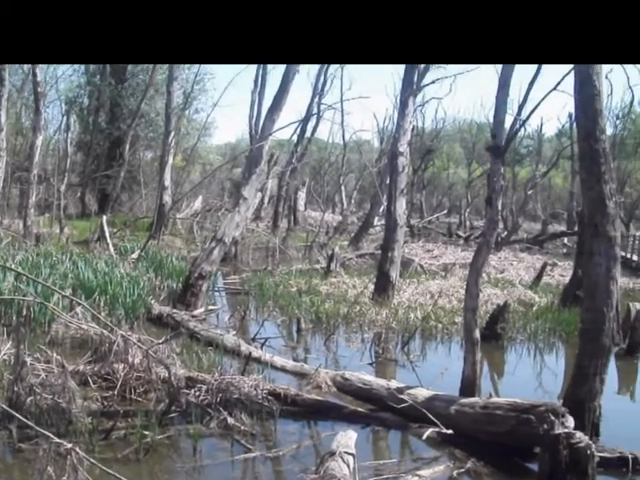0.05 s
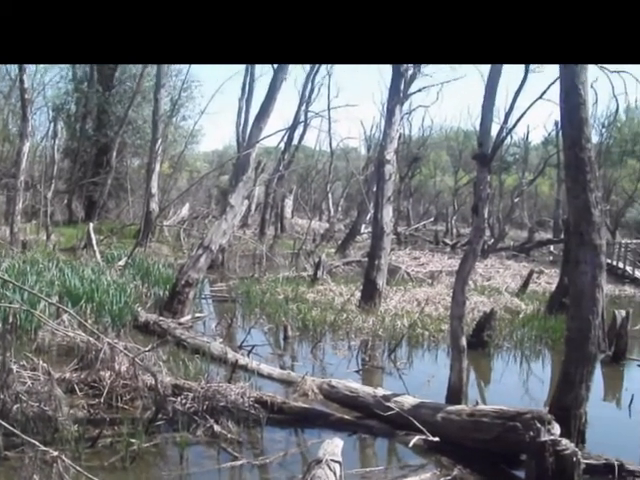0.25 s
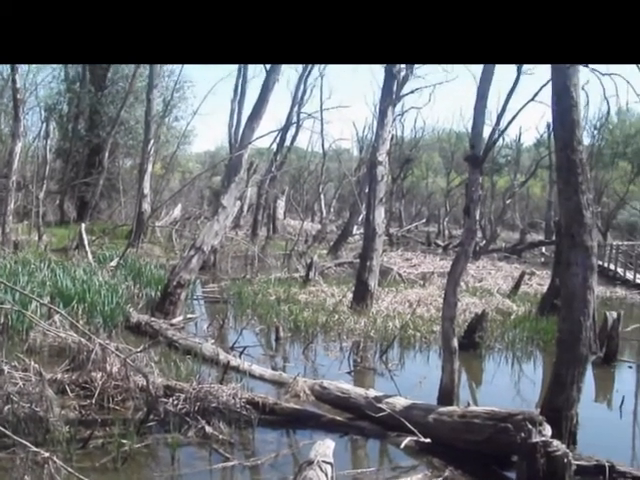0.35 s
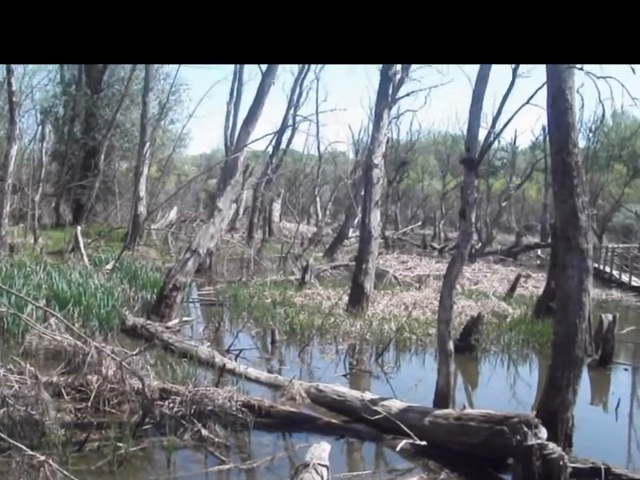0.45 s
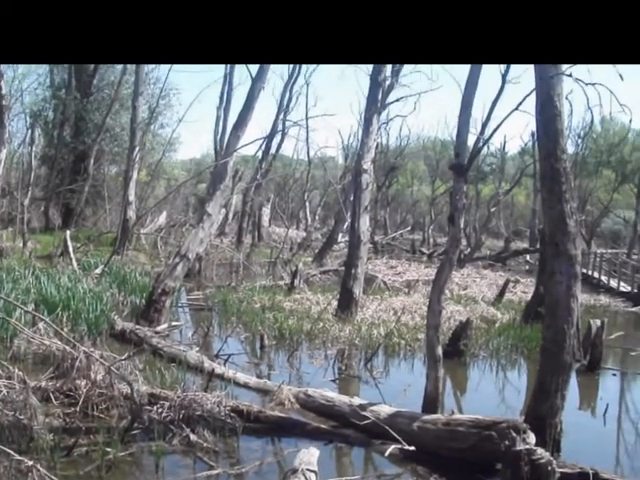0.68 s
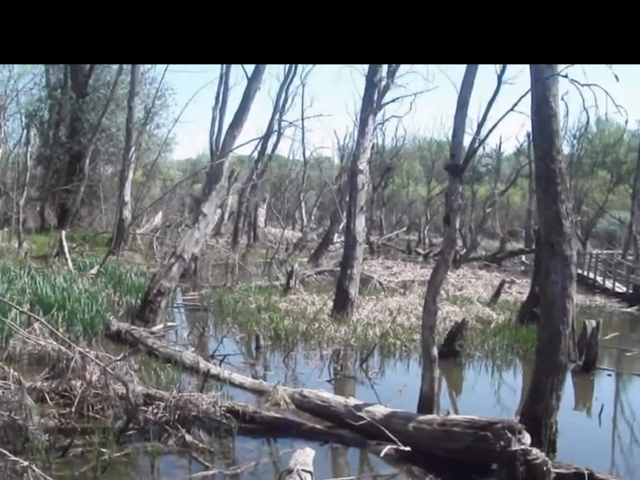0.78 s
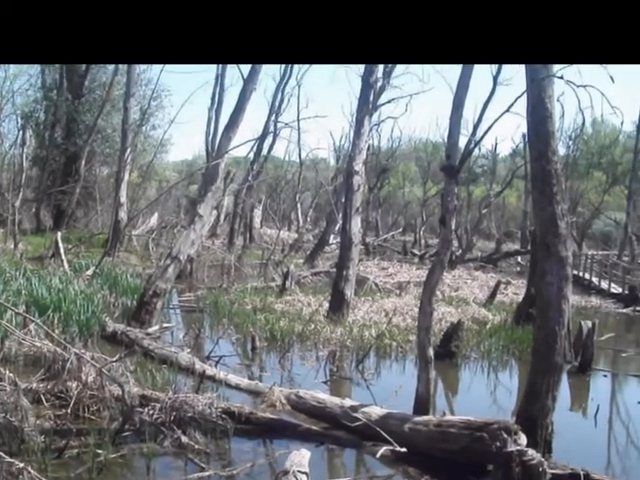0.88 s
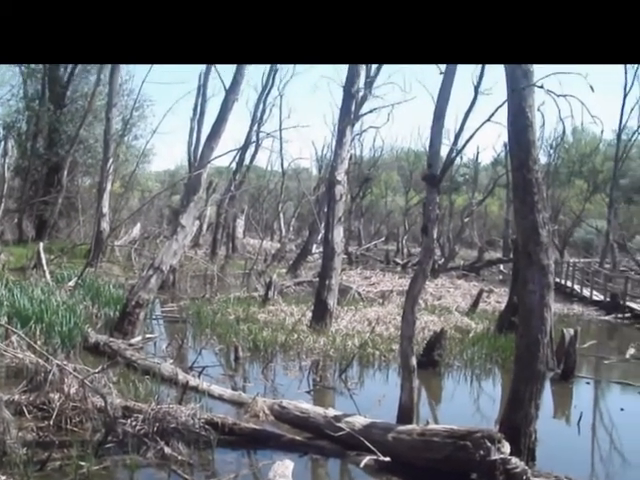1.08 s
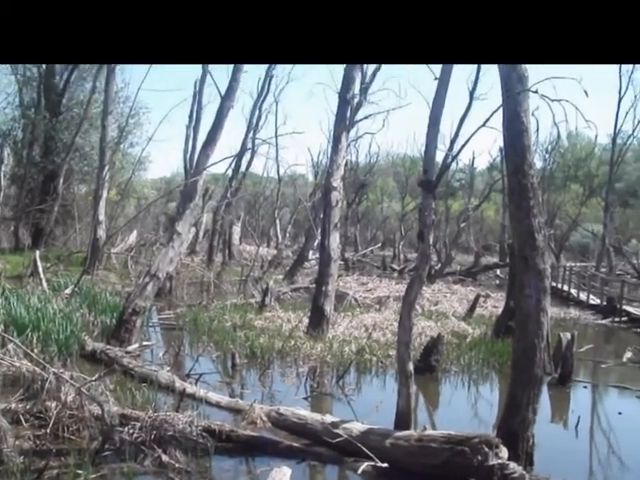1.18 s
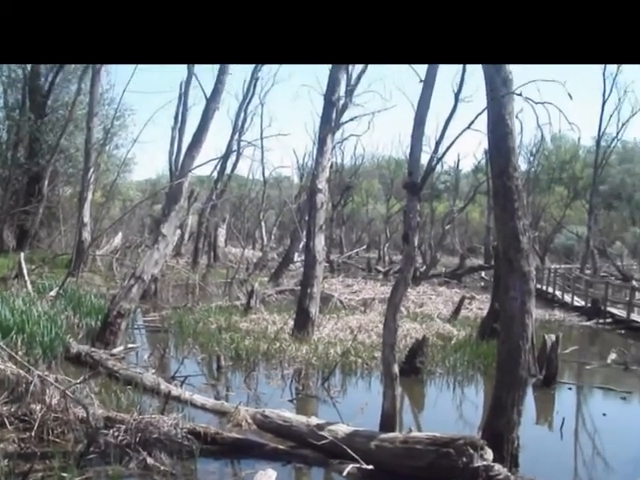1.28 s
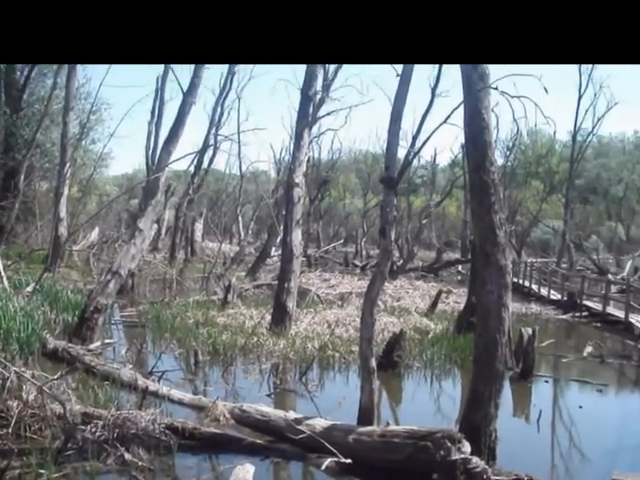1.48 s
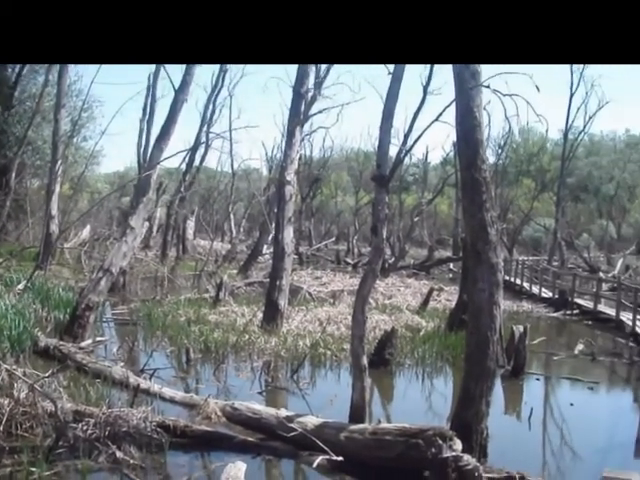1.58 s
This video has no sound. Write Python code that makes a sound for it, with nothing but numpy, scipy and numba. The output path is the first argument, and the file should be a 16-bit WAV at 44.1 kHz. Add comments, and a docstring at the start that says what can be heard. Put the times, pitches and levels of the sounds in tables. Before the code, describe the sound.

Frogs croak and cluck in a marsh over a distant chorus and steady hiss.

```python
"""Frogs in a flooded wood. From the start a distant chorus murmurs over the air and a camera's hiss and
whine, while frogs further out rattle short, low croaks: pulses that ring sac and body. At 0.3 s a small
bird begins to whistle faintly. From 0.46 s one close frog gives four sharp, falling clucks, its vocal
folds driving sac and throat; from 0.84 s a far frog answers with six. Last come a few more croaks and
whistles and a little handling noise. Water and trunks return a thin echo of the calls."""
import sys
import numpy as np
from scipy import signal
from scipy.fft import rfft, irfft
from scipy.io import wavfile
from scipy.ndimage import uniform_filter1d
from numba import njit

SR = 44100
rng = np.random.default_rng(int(sys.argv[2]) if len(sys.argv) > 2 else 0)


def store_wav(level_fs):
    """Save 16-bit WAV to argv[1]."""
    pcm = np.round(np.clip(np.atleast_2d(level_fs), -1, 1) * 32767)
    wavfile.write(sys.argv[1], SR, pcm.T.astype(np.int16))


N = 72765
CROAK_LOW_HZ, CROAK_TOP_HZ = 354, 2760


def undb(db):
    return 10 ** (np.asarray(db) / 20)


def unit(x):
    return x / np.sqrt(np.mean(x ** 2) + 1e-18)


def noise():
    return rng.standard_normal(N)


def since(start):
    """Seconds since start, zero before it."""
    return np.maximum(np.arange(N) / SR - start, 0)


def walk(rate):
    """Random modulation of unit RMS: straight lines between `rate` values a second."""
    step = max(int(SR / rate), 1)
    return unit(uniform_filter1d(np.repeat(noise()[:N // step + 1], step), step)[:N])


def cut(x, hz, kind, order=4):
    return signal.sosfilt(signal.butter(order, hz, kind, fs=SR, output="sos"), x)


def ring(x, hz, width_hz):
    """A second-order resonator, gain 1 at its centre."""
    return signal.lfilter(*signal.iirpeak(hz, hz / width_hz, fs=SR), x)


def formant(x, hz, width_hz):
    """Two resonators in cascade, the second twice as wide, scaled to unit RMS."""
    return unit(ring(ring(x, hz, width_hz), hz, 2 * width_hz))


@njit
def sweep(x, hz, width_hz):
    """A time-varying resonator, gain 1 at its moving centre."""
    y, band_state, low_state = np.empty(len(x)), 0., 0.
    for i in range(len(x)):
        g, damping = np.tan(np.pi * hz[i] / SR), width_hz / hz[i]
        band = (band_state + g * (x[i] + 1e-18 - low_state)) / (1 + g * (g + damping))
        band_state, low_state = 2 * band - band_state, low_state + 2 * g * band
        y[i] = damping * band
    return y


def wood(x, echo_db):
    """Reverberation: sparse early reflections off water and trunks, then a diffuse, duller tail."""
    early_t60_s, tail_t60_s = .14, .75
    t = since(0)
    early = noise() * (rng.random(N) < .03) * (t > .004) * undb(-60 * t / early_t60_s)
    tail = noise() * (t > .015) * undb(-60 * t / tail_t60_s)
    tail = cut(undb(.5) * unit(tail), 3640, "low", order=2)
    response = undb(echo_db) * (unit(early) + tail) / np.sqrt(N)
    return x + signal.fftconvolve(x, response)[:N]


def air():
    """Stationary coloured noise: a steady outdoor wash over a low rumble."""
    # spectrum of the wash: f/Hz, relative spectral level/dB
    spectrum = [(15, -4.5), (30, 4.5), (64, -2), (140, -7), (291, -6.5), (477, -16.5), (706, -2.5),
                (992, 3.5), (1160, -3), (2170, -1), (3560, -16), (5550, -21.5), (9360, -25), (10900, -24.5),
                (12800, -76)]
    hz, db = np.array(spectrum).T
    colour = undb(np.interp(np.log(np.fft.rfftfreq(N, 1 / SR) + 1), np.log(hz), db))
    wash = unit(irfft(rfft(noise()) * colour, N))
    rumble = unit(cut(noise(), 58, "low", order=2))
    return undb(-43.5) * wash + undb(-65.5) * rumble


def camera_noise():
    """Self-noise: a whine modulated in amplitude and phase, and hiss with a thin resonance."""
    # lines of the whine: f/whine_hz, level before modulation/dB
    lines = [(1 / 2, -68), (3 / 4, -71), (1, -54.5)]
    whine_hz, flutter_hz = 10745, 40.68
    cycle = (flutter_hz * since(0)) % 1
    dip = undb(-9 * (cycle < .29))
    flip = np.where(abs(cycle - .44) < .025, -1, 1)  # a brief phase reversal ticks once a cycle
    phase = 2 * np.pi * whine_hz * since(0)
    whine = sum(undb(db) * np.sqrt(2) * ring(dip * flip * np.sin(k * phase), k * whine_hz, 1300)
                for k, db in lines)
    hiss = undb(-61) * noise() + undb(-72) * unit(ring(noise(), whine_hz / 2, width_hz=70))
    return whine + hiss


def handling():
    """Damped transients: handling the camera gives tiny ticks and soft bumps of band-limited noise."""
    # ticks: t/s, initial level/dB
    ticks = [(1.47, -43), (1.549, -42)]
    # bumps: t/s, f/Hz, bandwidth/Hz, initial level/dB
    bumps = [(.015, 240, 90, -50), (1.333, 150, 170, -40.5), (1.330, 50, 60, -41)]
    burst = lambda start, decay_s: (since(start) > 0) * np.exp(-since(start) / decay_s)
    out = 0
    for start, db in ticks:
        out += undb(db) * burst(start, decay_s=.0022) * unit(ring(noise(), 6500, 2500))
    for start, hz, width, db in bumps:
        out += undb(db) * burst(start, decay_s=.02) * unit(ring(ring(noise(), hz, width), hz, width))
    return out


def chorus():
    """Shot noise: the random pulses of many far frogs excite resonances, each swelling on its own."""
    # resonances of the chorus: f/Hz, bandwidth/Hz, median level/dB
    bands = [(447, 182, -50), (537, 210, -56), (963, 300, -63), (1620, 1550, -58), (2376, 430, -58.5),
             (2685, 310, -57)]
    pulses_per_s, swells_per_s = 900, 15
    out = 0
    for hz, width, db in bands:
        pulses = noise() * (rng.random(N) < pulses_per_s / SR)
        out += undb(db - walk(swells_per_s)) * formant(pulses, hz, width)
    return cut(out, CROAK_LOW_HZ, "high")


def bird():
    """Frequency modulation: each thin whistle is a sine that glides with a slight random warble."""
    # whistles: t/s, duration/s, first f/Hz, last f/Hz, level at the crest/dB
    whistles = [(.324, 0.0363, 5410, 4860, -43), (.368, 0.046, 5380, 5860, -49.5),
                (.447, 0.029, 5600, 5600, -51.5), (.552, 0.026, 5650, 5470, -46),
                (.712, 0.042, 5380, 5260, -47.5), (.744, .030, 5200, 4880, -36),
                (.768, .038, 4820, 4420, -44), (.872, .040, 4850, 4550, -53),
                (0.835, 0.081, 7540, 7640, -63), (1.03, .06, 7470, 7630, -64),
                (1.345, 0.035, 5130, 5120, -64), (1.52, .04, 5170, 5300, -60),
                (1.607, 0.034, 5250, 5150, -61)]
    out = 0
    for start, length, first_hz, last_hz, db in whistles:
        progress = np.minimum(since(start) / length, 1)
        hz = (first_hz + (last_hz - first_hz) * progress) * (1 + .018 * walk(rate=800))
        out += undb(db) * np.sqrt(2) * np.sin(np.pi * progress) * np.sin(2 * np.pi * np.cumsum(hz) / SR)
    return out


def croak(start, length, rate, hz, width_hz, db, body_hz, body_db, rasp_db):
    """Impulse excitation: a short, swelling pulse train and a noisy rasp ring the sac and the body."""
    k = np.arange(32)
    jitter, scatter_db = rng.standard_normal((32, 2)).T
    times = start + (k + .02 * jitter) / rate
    swell = np.minimum(.75 + k / rate / .005, 1)
    sizes = swell * undb(scatter_db) * np.clip(length * rate - k, 0, 1)
    pulses = np.bincount(np.clip(times * SR, 0, N).astype(int), sizes, N + 1)[:N]
    rasp = noise() * np.sin(np.pi * np.minimum(since(start) / length, 1))
    source = unit(pulses) + undb(rasp_db) * unit(rasp)
    sac = formant(source, hz, width_hz)
    body = formant(source, body_hz, width_hz=192)
    return undb(db) * np.sqrt(length * SR / N) * (sac - undb(body_db) * body)


def croaking_frogs():
    """Superposition of the croaks from further out, limited to a middle band."""
    # croaks: t/s, duration/s, pulse rate/Hz, sac f/Hz, sac bandwidth/Hz, sac level/dB,
    # body f/Hz, body level re sac/dB, rasp level re pulses/dB
    calls = [(.000, 0.036, 170, 644, 404, -44, 420, -5, -6.5),
             (0.112, 0.057, 245, 1525, 191, -45, 423, -4, -18),
             (0.181, 0.12, 205, 775, 111, -47, 433, -3.5, -8),
             (0.197, 0.043, 256, 1360, 248, -42, 413, -4, -4.5),
             (0.232, 0.018, 207, 1520, 294, -37.5, 427, -3.5, 2),
             (0.254, 0.019, 237, 1670, 594, -44.5, 456, 5.5, 4),
             (0.273, 0.028, 255, 970, 167, -33, 442, -12.5, -21),
             (0.304, 0.014, 260, 1064, 132, -25, 435, -18, 2.5),
             (0.318, 0.034, 197, 1210, 496, -38, 388, 1.5, -19),
             (0.337, 0.043, 210, 1140, 590, -32, 423, -29, 9),
             (0.358, 0.031, 147, 1430, 720, -30.5, 574, -8, 9),
             (0.389, 0.0183, 226, 1195, 294, -29.5, 444, -10, 4.5),
             (0.544, 0.021, 198, 1280, 445, -36.5, 384, -4, 4.5),
             (0.629, 0.037, 267, 1480, 295, -34.5, 540, -12.5, -24),
             (0.665, 0.063, 257, 1390, 243, -33, 510, -15, 3),
             (0.703, 0.024, 238, 1065, 242, -31, 456, -12, -31),
             (0.726, 0.022, 310, 1150, 404, -27.5, 426, -9.5, 13),
             (0.741, 0.017, 250, 1270, 252, -28.5, 487, -39, 22),
             (0.768, 0.013, 300, 1120, 310, -24, 563, -7.5, -11),
             (0.785, 0.016, 254, 1260, 360, -26, 485, -9.5, -5),
             (.801, 0.022, 160, 1360, 425, -29, 496, -5, 3),
             (0.826, 0.016, 226, 1490, 714, -33.5, 430, -9.5, -8),
             (.880, 0.035, 270, 990, 167, -35.5, 463, -20, -4),
             (0.894, 0.024, 224, 1300, 161, -28.5, 470, -8.5, 2),
             (.975, 0.02, 246, 1050, 510, -48.5, 460, 12, -24),
             (1.075, 0.026, 200, 1070, 510, -57.5, 520, 9.5, -5),
             (1.257, .026, 90, 880, 350, -44, 500, -4, -9), (1.303, .016, 182, 980, 270, -35, 540, -6, -12),
             (1.338, .022, 172, 1040, 230, -34.5, 560, -7, -12),
             (1.378, .020, 205, 1200, 220, -33, 570, -7, -13),
             (1.405, 0.026, 144, 1180, 790, -45, 540, 4.5, 3),
             (1.613, 0.019, 156, 880, 660, -48, 550, -6, 2)]
    croaks = sum(croak(*row) for row in calls)
    return cut(cut(croaks, CROAK_LOW_HZ, "high"), CROAK_TOP_HZ, "low")


def cluck(start, hold, hz, low_hz, sac_hz, db, after_db, fade, top_hz, jitter):
    """Source and filter: vocal folds drive sac and throat; the note swells, drops and fades in a rasp."""
    # throat resonances: f/sac_hz, bandwidth/Hz, gain/dB, gain change at the drop/dB
    resonances = [(.3, 610, -12.5, -2.5), (.67, 750, -46, 31), (1.32, 120, -40, 27.5),
                  (2.03, 160, -26.5, 5), (2.41, 380, -19, 7), (2.63, 1000, -20, -26)]
    drop_s, sag_per_s, sac_width_hz = .0015, 2, 345.
    t = since(start)
    drop = .5 + .5 * np.tanh((t - hold) / drop_s / 2)  # 0 to 1 as the voice breaks
    pitch = hz * np.exp(-sag_per_s * (t - hold / 2)) * (1 - drop) + low_hz * drop
    pitch *= 1 + (.009 + jitter * drop) * walk(rate=700)
    phase = 2 * np.pi * np.cumsum(pitch * (t > 0)) / SR
    folds = sum(np.cos(k * phase) for k in range(1, 12))
    puffs = unit(cut(noise() * (1 + np.cos(phase)), [2500, 5700], "band"))  # one puff a period
    rasp = undb(-4 + 6 * drop) * puffs
    attack = np.sin(np.pi / 2 * np.minimum(t / (.62 * hold), 1)) ** 2
    decay = np.exp(-np.maximum(t - hold - 2 * drop_s, 0) / fade)
    source = (folds + rasp) * attack * undb(after_db * drop) * decay
    centre_hz = sac_hz * (1 - .12 * np.tanh((t - hold) / .05))  # the sac resonance sinks
    sac = sweep(sweep(source, centre_hz, sac_width_hz), centre_hz, sac_width_hz)
    throat = sum(undb(gain + lift * drop) * ring(ring(source, k * sac_hz, width), k * sac_hz, width)
                 for k, width, gain, lift in resonances)
    return undb(db) * np.sqrt(2) * cut(sac + throat, top_hz, "low", order=8)


def clucking_frogs():
    """Superposition of the close frog's four clucks and the far frog's six fainter, duller answers."""
    # clucks: t/s, hold before the drop/s, pitch f/Hz, dropped pitch f/Hz, sac f/Hz, gain/dB,
    # gain change at the drop/dB, decay time/s, cutoff f/Hz, relative pitch jitter added at the drop
    calls = [(.461, 0.023, 713, 539, 2126, -18.5, -3.5, 0.017, 6000, 0.07),
             (.563, .015, 696.7, 547, 2153, -17, -2, 0.022, 5900, 0.04),
             (.658, 0.016, 687, 537.3, 2068, -18, -5, 0.023, 5800, 0.1),
             (.750, 0.015, 655, 580.4, 2023, -15.5, -5.5, 0.02, 4500, 0.11),
             (.835, .010, 759, 576.3, 2320, -34, -1.5, 0.11, 2770, .14),
             (.925, .008, 773, 587, 2380, -32.5, -3.5, 0.083, 2760, 0.1),
             (.990, 0.00979, 769, 573.7, 2380, -35.5, -0.5, 0.082, 2830, .12),
             (1.078, 0.011, 731, 571, 2250, -36, -2, 0.052, 2860, 0.03),
             (1.160, .010, 760, 553.5, 2280, -41.5, 6, .05, 2740, 0.19),
             (1.230, .0091, 692, 528, 2030, -47, 6, 0.018, 2760, 0.22)]
    return sum(cluck(*row) for row in calls)


def scene():
    """Superposition: the calls and their echoes add to the chorus, the air and the camera's noise."""
    clucks = wood(clucking_frogs(), echo_db=-13)
    croaks = croaking_frogs()
    calls = clucks + wood(bird(), echo_db=-7) + wood(croaks, echo_db=-12)
    return (calls + chorus() + air() + handling() + camera_noise())[None]


def record(dry):
    """Band limiting: the camera's steep low-pass filter removes the top of the treble."""
    top_hz = 12850
    return signal.sosfilt(signal.ellip(10, .2, 80, top_hz, fs=SR, output="sos"), dry)


dry = scene()
out = record(dry)
store_wav(out)
```